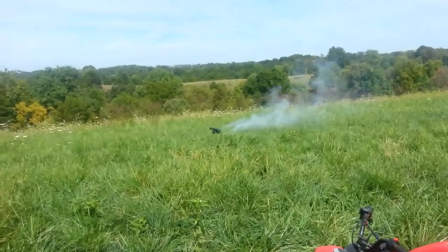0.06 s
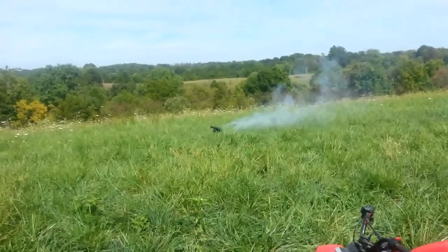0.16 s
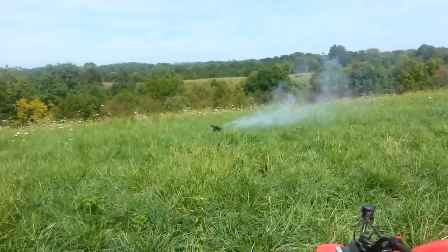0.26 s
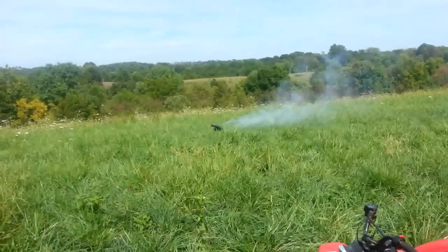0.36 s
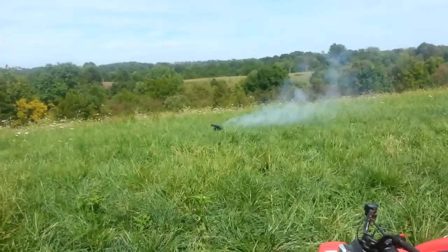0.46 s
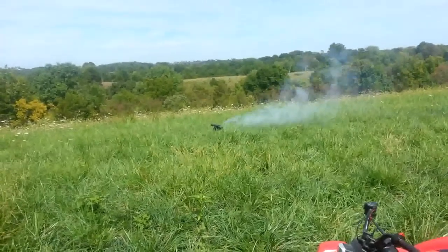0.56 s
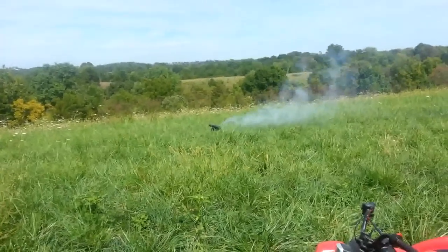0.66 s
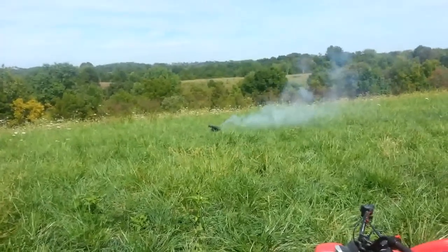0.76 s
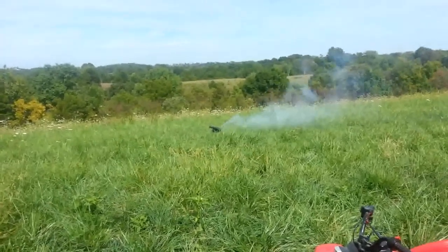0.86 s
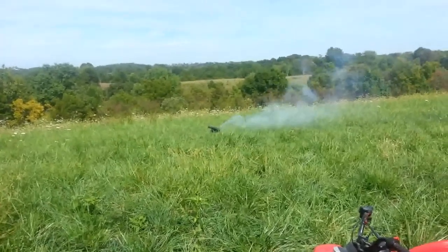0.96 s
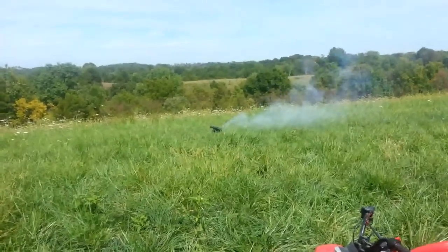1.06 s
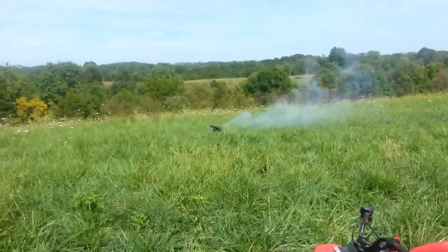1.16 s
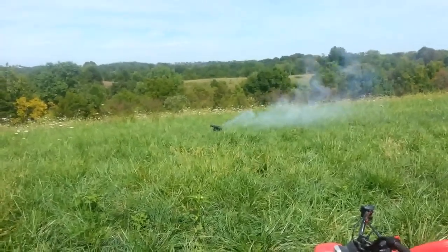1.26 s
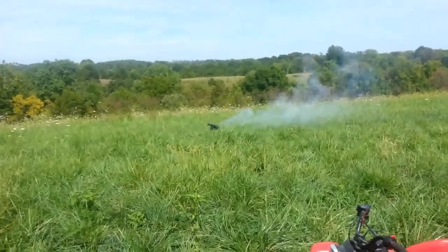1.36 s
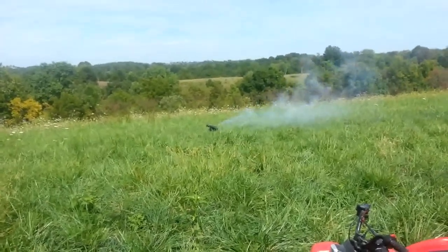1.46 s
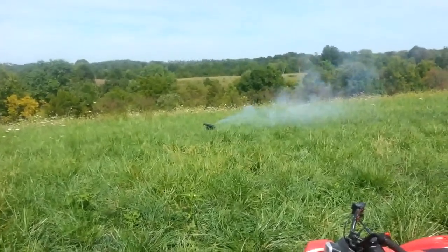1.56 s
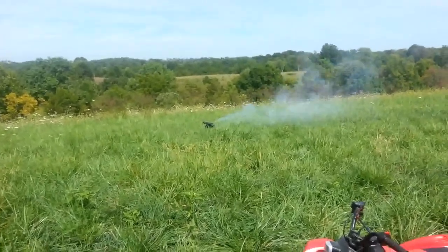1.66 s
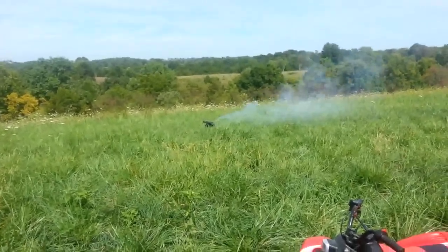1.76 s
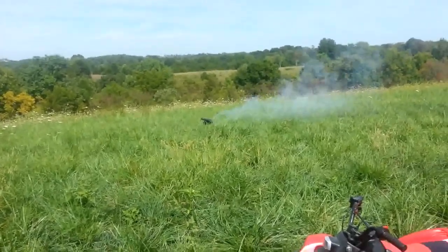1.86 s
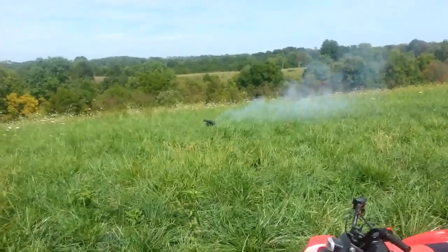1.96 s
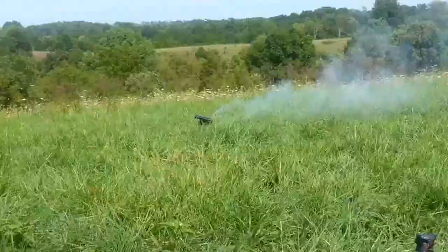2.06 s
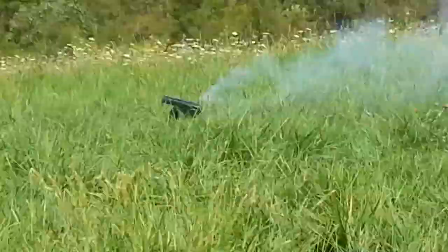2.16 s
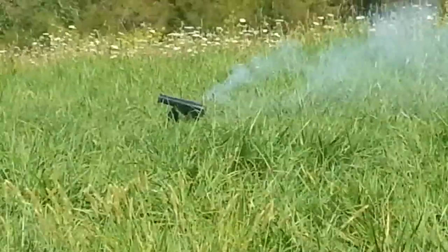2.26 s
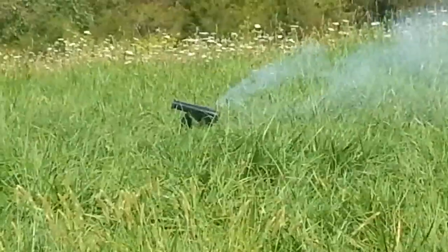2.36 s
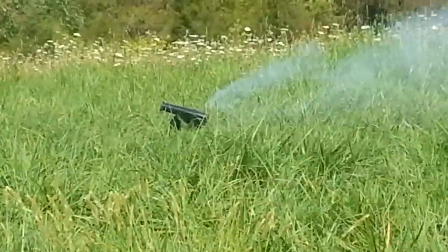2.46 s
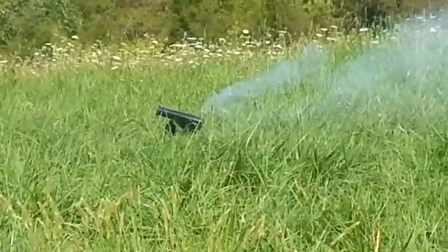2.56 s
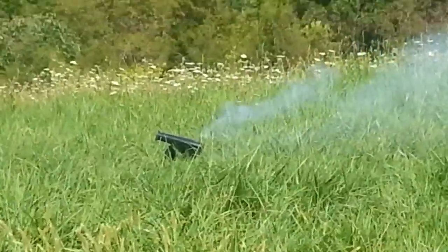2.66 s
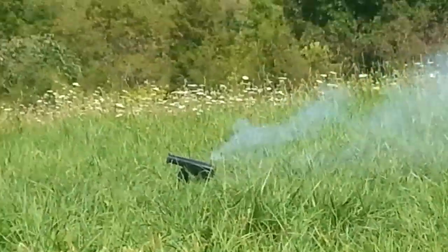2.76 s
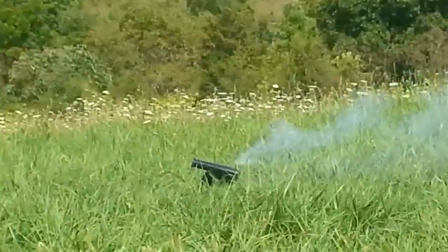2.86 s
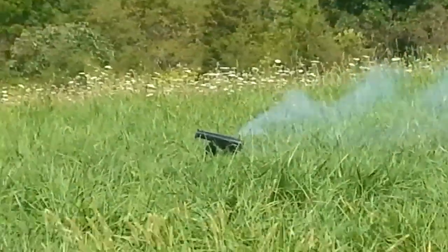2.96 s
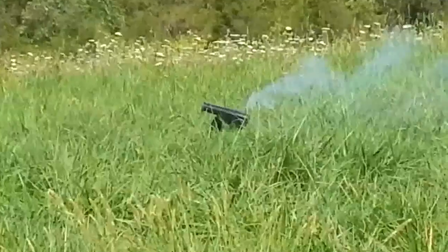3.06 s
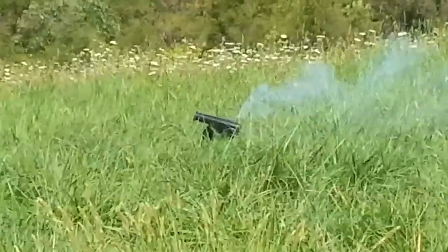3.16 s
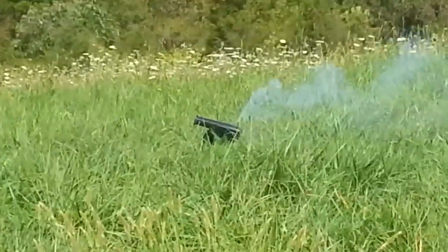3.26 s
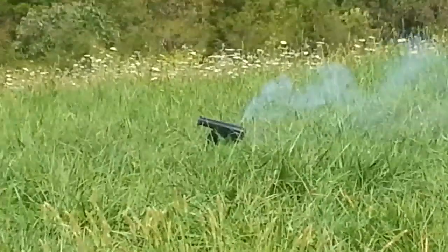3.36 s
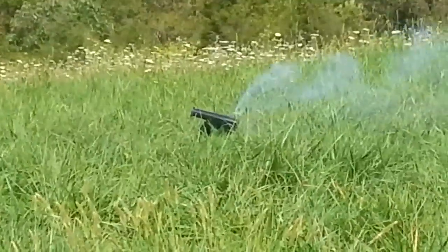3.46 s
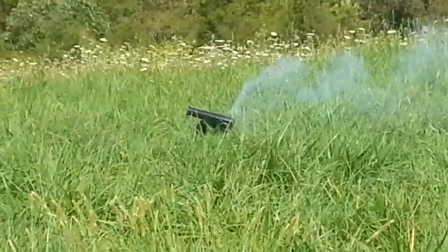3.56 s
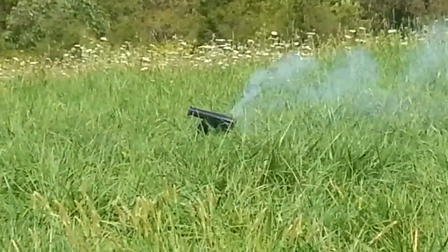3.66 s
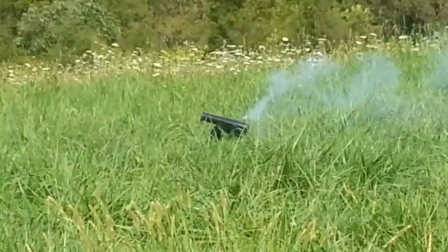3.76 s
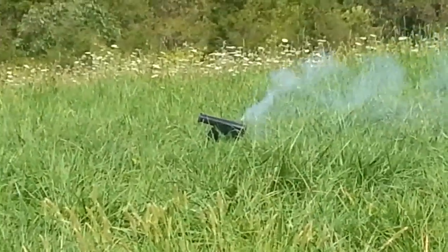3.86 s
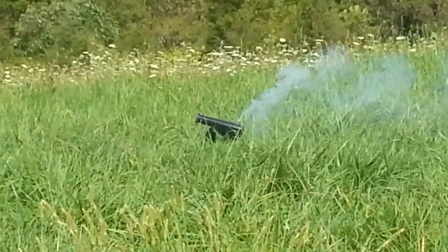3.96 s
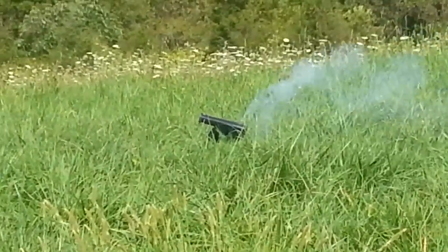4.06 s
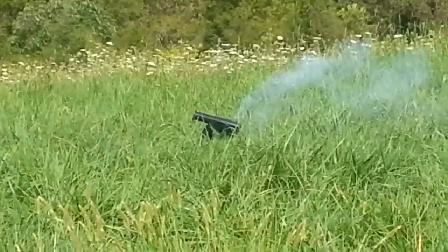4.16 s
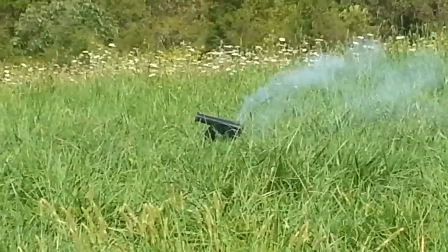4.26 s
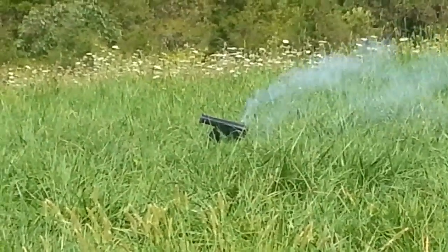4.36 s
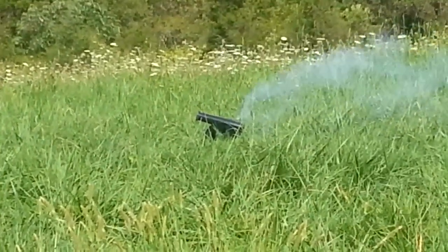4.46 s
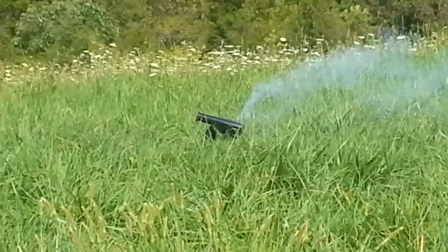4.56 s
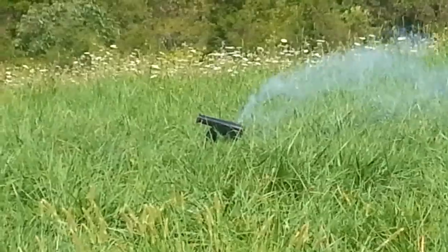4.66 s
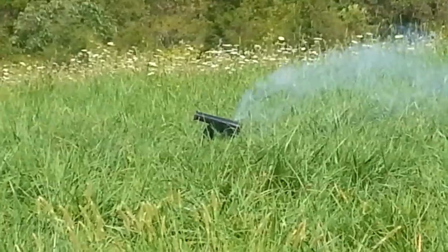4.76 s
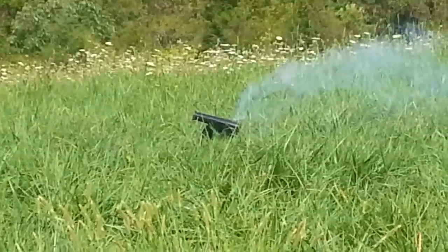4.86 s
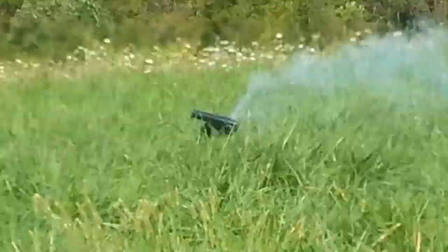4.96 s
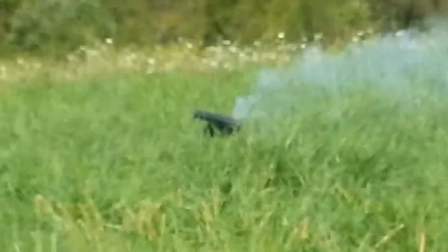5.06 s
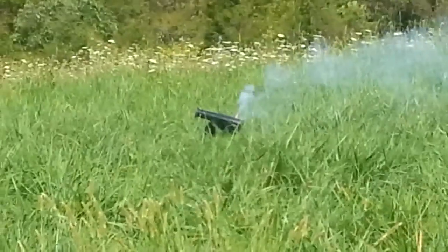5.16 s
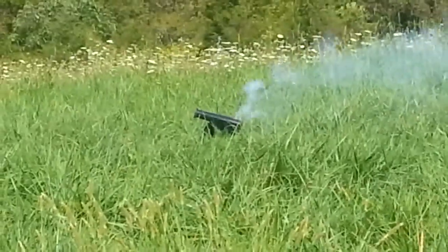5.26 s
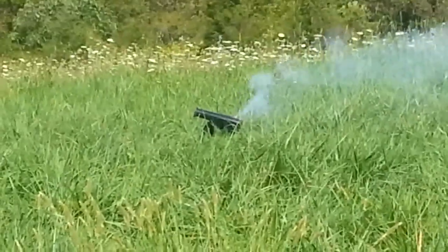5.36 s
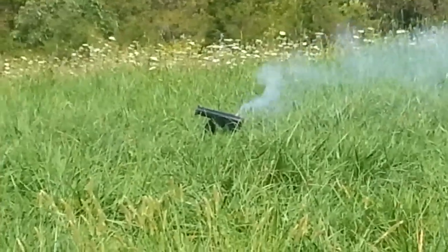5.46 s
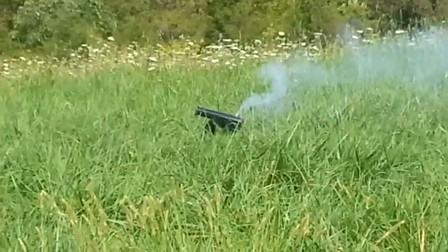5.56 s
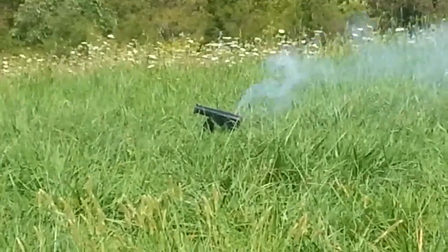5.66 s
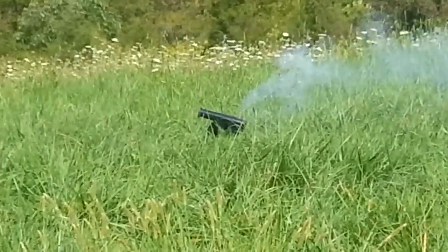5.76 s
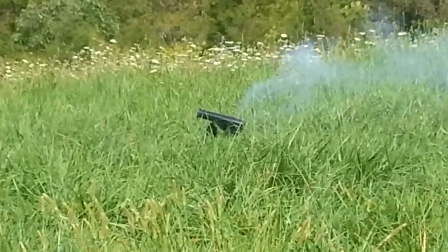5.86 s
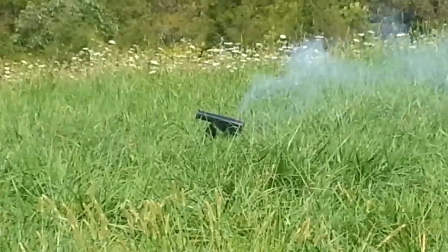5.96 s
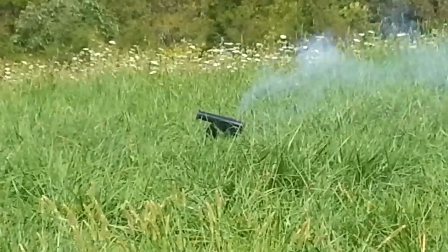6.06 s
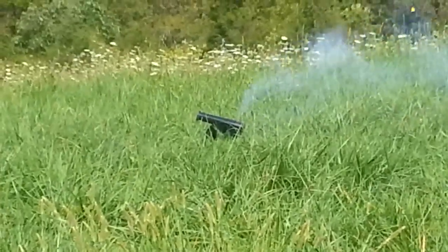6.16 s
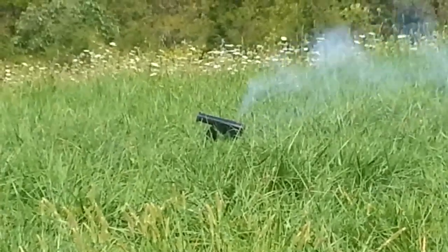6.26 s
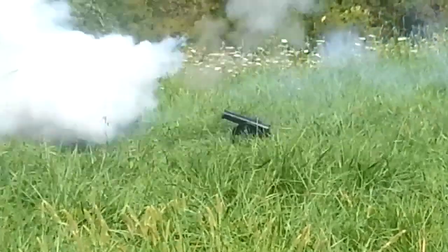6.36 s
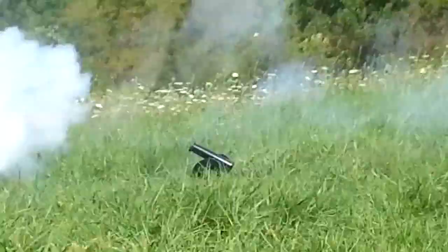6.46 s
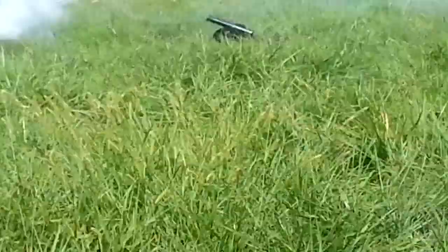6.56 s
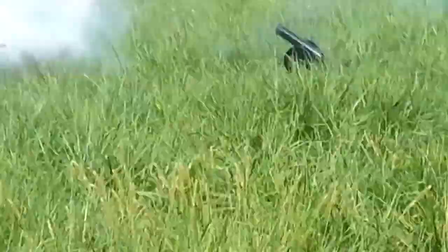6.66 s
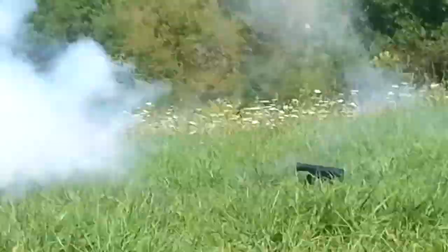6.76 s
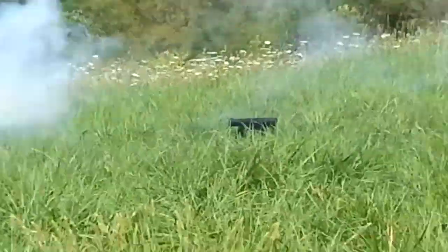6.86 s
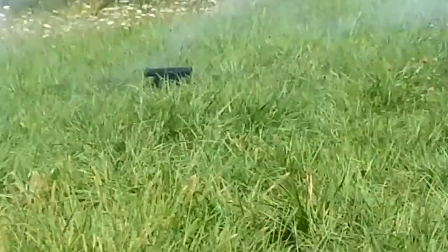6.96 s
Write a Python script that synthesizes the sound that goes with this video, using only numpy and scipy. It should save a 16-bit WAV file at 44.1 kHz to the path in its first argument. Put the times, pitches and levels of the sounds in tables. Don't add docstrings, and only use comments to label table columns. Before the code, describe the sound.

A quiet summer meadow heard through a handheld stereo microphone. From 0 s a fuse hisses thinly and unevenly, with a fast, raspy katydid buzz, a high throbbing cricket, and soft breeze. Light finger taps land at 0.3 and 0.7 s; a tiny strap creak comes near 1.7 s, then a cluster of taps and a hard, close plastic knock at 1.9 s. The buzz stops around 2.8 s; from 3.0 to 4.8 s the katydid only ticks, about twelve times a second, over distant insect hiss, with rough slips and dry clicks strongest near 3.1 s. The buzz swells again from 4.8 s and the fuse flares at 5.9 s. At 6.47 s the cannon fires: an abrupt, distorted, full-scale bang with dense ground roar, hard slaps near 6.6 and 6.7 s, then a bright tree echo from 6.72 s, fading and dulling to the end, the meadow greatly ducked.

```python
import sys
import numpy as np
from scipy import signal
from scipy.fft import rfft, irfft, next_fast_len
from scipy.io import wavfile

SR = 44100
rng = np.random.default_rng(int(sys.argv[2]) if len(sys.argv) > 2 else 0)


def wrap_up_sound(samples):
    columns = np.atleast_2d(samples).T
    tamed = np.clip(columns, -1, 1)
    steps = np.round(tamed * 32767).astype(np.int16)
    wavfile.write(sys.argv[1], SR, steps)


def magnitude_from_level(level_db):
    exponent = np.asarray(level_db, float) / 20
    return 10 ** exponent


N = 309564
TIME = np.arange(N) / SR
FIRE_S = 6.4748


def rms_one(x):
    return x / np.sqrt(np.mean(x ** 2) + 1e-20)


def at_hz(points, hz):
    points = np.array(points)
    return np.interp(np.log(hz + 1), np.log(points[:, 0]), points[:, 1])


def pan(x, db):
    return np.outer(magnitude_from_level([min(db, 0), min(-db, 0)]), x)


def band(x, low_hz, high_hz):
    return signal.sosfilt(signal.butter(2, [low_hz, high_hz], "band", fs=SR, output="sos"), x)


def resonance(x, hz, width_hz):
    r = np.exp(-np.pi * width_hz / SR)
    poles = [1, -2 * r * np.cos(2 * np.pi * hz / SR), r * r]
    return signal.lfilter([(1 - r * r) / 2, 0, (r * r - 1) / 2], poles, x)


def ring(force, hz, t60):
    r, w = magnitude_from_level(-60 / (t60 * SR)), 2 * np.pi * hz / SR
    return signal.lfilter([0, np.sin(w)], [1, -2 * r * np.cos(w), r * r], force)


def shock(s, width_s):
    u = (TIME - s) / width_s
    return np.where((u >= 0) & (u < 1), 1 - 2 * u, 0)


def drift(rate):
    return np.interp(TIME * rate, np.arange(800), rng.standard_normal(800))


def swells(rows):
    return sum(magnitude_from_level(db) * np.exp(-((TIME - s) / half_s) ** 2) for s, half_s, db in rows)


def ramp(start_s, length_s):
    return np.clip((TIME - start_s) / length_s, 0, 1)


def wide_noise(spectrum, alike, balance):
    size = next_fast_len(N)
    hz = np.arange(size // 2 + 1) * SR / size
    mid, side = rfft(rng.standard_normal((2, size))) * magnitude_from_level(at_hz(spectrum, hz))
    share = np.clip(at_hz(alike, hz), -1, 1)
    tilt = magnitude_from_level(at_hz(balance, hz) / 2)
    mid, side = mid * np.sqrt(1 + share), side * np.sqrt(1 - share)
    return irfft(np.array([(mid + side) * tilt, (mid - side) / tilt]), size)[:, :N]


def cannon():
    # arrival in seconds, level in dB, left-right difference in dB.
    slaps = [(6.59, -3, 14), (6.696, 3, 21), (6.7115, 4, 23), (6.8945, -2, 2), (6.8975, 4, 18),
             (6.942, -12, 9)]
    after = TIME - FIRE_S
    rise = np.where(after < 0, magnitude_from_level(-24) * np.exp(np.minimum(after, 0) / .0022), 1)
    excess = magnitude_from_level(10 * np.exp(-np.maximum(after, 0) / .05))
    handover = ramp(6.712, .025)
    ground = from_right(ground_roar(), 17, ramp(6.47, 0.039))
    trees = from_right(tree_roar(), 16, 1)
    out = rise * excess * np.sqrt(1 - handover) * ground + np.sqrt(handover) * magnitude_from_level(7) * trees
    thud_push = np.exp(-((TIME - 6.606) / 0.00089) ** 2) / (.002 * SR)
    out += magnitude_from_level(-5) * ring(thud_push, hz=137, t60=.1)
    out += magnitude_from_level(12.5) * band(shock(FIRE_S, 0.0038), 100, 21000)
    for s, db, side_db in slaps:
        out += pan(magnitude_from_level(db + 4) * band(shock(s, 0.00104), 550, 5900), side_db)
    return out


def ground_roar():
    # frequency in Hz, level in dB per Hz.
    tone = [(24, -55), (40, -18.5), (125, -10.5), (173, -10), (277, -4), (466, -4), (720, -4), (1170, -9),
            (2710, -13.5), (2990, -17.5), (4230, -17.5), (8270, -29), (15000, -33)]
    # frequency in Hz, likeness from 0 to 1.
    alike = [(60, .8), (300, .97), (1400, 0.82), (3000, 0.27), (8000, 0.23)]
    burst_s = 0.019
    later = np.maximum(TIME - FIRE_S - burst_s, 0)
    tail_db = -16 + 13.5 * np.exp(-later / 0.037) - 3 * later
    burst_db = -1 - 14 * ramp(FIRE_S, .8 * burst_s)
    level_db = burst_db + (tail_db - burst_db) * ramp(FIRE_S + 0.51 * burst_s, .012)
    low_db = -3 + 7 * np.exp(-((TIME - 6.59) / 0.073) ** 2)
    return returns(level_db, low_db, 8 - 125 * later, tone, alike, lumpy_db=4)


def tree_roar():
    # frequency in Hz, level in dB per Hz.
    tone = [(24, -52), (40, -29), (91, -21), (173, -10), (270, -12.5), (346, -7), (582, -3), (710, 2),
            (1200, 0.5), (2280, 3), (2920, -6), (3140, -3), (4450, -6.5), (15000, -40)]
    # frequency in Hz, likeness from 0 to 1.
    alike = [(60, 0.66), (300, 0.97), (1400, 0.66), (3000, 0.29), (8000, 0.12)]
    start_s, rise_s, hold_s = 6.722, .02, .045
    after = np.maximum(TIME - start_s, 0)
    held_s = start_s + rise_s + hold_s
    level_db = -16.5 - 10.5 * (1 - ramp(start_s, rise_s))
    level_db += -2 * ramp(held_s, 0.019) - 23 * np.maximum(TIME - held_s, 0)
    low_db = 1 + 3.5 * np.exp(-after / 0.028)
    return returns(level_db, low_db, 8.5 - 75 * after, tone, alike, lumpy_db=2)


def returns(level_db, low_db, high_db, tone, alike, lumpy_db):
    # frequency in Hz, left-right difference in dB.
    shot_pan = [(60, 2.5), (240, -0.5), (940, 1.5), (3710, 1.5), (14700, 1)]
    start = round(6.4 * SR)
    roar = wide_noise(tone, alike, shot_pan)[:, start:]
    spectrum = rfft(roar / np.std(band(roar.mean(axis=0), 1200, 3500)))
    octave = np.log2(np.arange(spectrum.shape[1]) * SR / (N - start) + 1)
    level_db, low_db, high_db = level_db[start:], low_db[start:], high_db[start:]
    dulling_db, brightening_db = np.minimum(high_db, 0), np.maximum(high_db, 0)
    out = np.zeros((2, N))
    for centre in np.arange(5, 15, .5):
        part = irfft(spectrum * np.clip(1 - 2 * np.abs(octave - centre), 0, 1), N - start)
        low = np.clip(10.5 - centre, 0, 1)
        high = max(2 ** centre - 2500, 0) / 6500
        part_db = level_db + low * low_db + high * dulling_db + min(6.3 * high, 1) * brightening_db
        out[:, start:] += part * magnitude_from_level(part_db + lumpy_db * drift(60)[start:])
    return out


def from_right(x, lag, share):
    left = np.sqrt(1 - share) * x[0] + np.sqrt(share) * np.roll(x[0], lag)
    return np.array([left, x[1]])


def fuse():
    # time in seconds, level in dB.
    burn = [(0.0, -55), (0.83, -57.5), (1.56, -57.5), (1.98, -54), (2.36, -53.5), (2.61, -52.5),
            (3.27, -53.5), (3.51, -56), (4.05, -56.5), (4.3, -51.5), (4.66, -55.5), (5.47, -57.5),
            (5.88, -51), (6.46, -52)]
    # centre in Hz, width in Hz, level in dB, share of the flare.
    jets = [(2470, 540, -1.5, 2.8), (3696, 570, 0, 0.83), (4170, 1100, 2.5, 0.79), (4800, 900, -16.5, 1.2)]
    own, shared = rng.standard_normal((2, N)), rng.standard_normal(N)
    spit = rms_one(own + 2.7 * shared) * magnitude_from_level(drift(110))
    level_db = np.interp(TIME, *np.transpose(burn))
    flare_db = -0.06 * (level_db + 54.5)
    hiss = np.zeros((2, N))
    for hz, width, db, share in jets:
        jet = resonance(resonance(spit, hz, width), hz, 2 * width)
        hiss += magnitude_from_level(db + share * flare_db + 0.52 * drift(15)) * jet
    return hiss * magnitude_from_level(level_db + 12)


def handling():
    # time in seconds, peak in dB, ring in Hz, left-right in dB, snap in dB.
    taps = [(0.331, -43, 726, -3, -1), (0.692, -27.5, 1077, -3.5, 3), (1.588, -33, 430, 21, 3),
            (1.726, -40, 584, 14, -7), (1.938, -35, 547, 22, 3), (1.9955, -32, 764, 13, 4.5),
            (2.176, -45, 537, 11, -6), (2.253, -45, 1310, -9, -3), (2.519, -42, 1380, 2.5, -5),
            (3.015, -25, 170, 29, -19), (3.083, -28, 530, 24, -5), (3.243, -28, 455, 30, -9),
            (5.843, -39, 230, 0.0, -12), (6.16, -41.5, 302, 7, -3.5)]
    # peak in dB, ring in Hz, left-right in dB, t60 in seconds, snap in dB.
    knock = [
        (-19, 613, 28, 0.052, 2),
        (-9.5, 960, -36.5, 0.012, -6),
        (-20, 1100, 44, 0.0022, 23.5),
        (4.5, 526, 56, 0.0077, -11.5),
        (-27.5, 1340, 32, 0.018, 21.5),
    ]
    knock_s = (1.9022, 1.9076, 1.9077, 1.9081, 1.9195)
    # time in seconds, peak in dB, ring in Hz, left-right in dB.
    rubs = [(1.489, -51, 816, -5), (2.412, -46, 676, 10), (2.468, -41, 614, 41), (2.993, -36.5, 474, 15),
            (3.038, -49, 536, 12), (3.08, -30.5, 523, 41), (3.151, -36.5, 517, 27),
            (3.206, -36.5, 1080, -3), (3.224, -36.5, 900, 13), (3.243, -30, 834, 35), (3.767, -46, 543, 2),
            (3.901, -45.5, 1490, 3), (4.199, -52, 890, -3), (4.416, -49.5, 830, 0.0),
            (5.665, -45.5, 704, -2)]
    # time in seconds, level in dB, left-right in dB.
    clicks = [(.334, -36, -3), (2.057, -38, 12), (2.178, -38, 15), (2.410, -28.5, 8), (2.471, -27, 20),
              (2.524, -36, 4), (3.086, -21.5, 20), (3.246, -34, 22), (3.775, -29, 3), (4.424, -44, 2),
              (5.845, -48, 0)]
    # time in seconds, half length in seconds, level in dB.
    creaks = [(1.675, 0.026, -52), (1.8, 0.024, -50)]
    out, size = np.zeros((2, N)), SR // 10
    t = np.arange(size) / SR
    touch = t == 0
    rattle = band(rng.standard_normal(size), 800, 6000) * np.exp(-t / .004)
    snap = ring(touch, 4000, .002) + .6 * ring(touch, 2200, .003)
    snap += .4 * ring(touch, 8500, .0012) + .1 * rattle
    hits = [(s + 0.00176, db, hz, side_db, 0.031 * (hz / 1e3) ** 0.58, snap_db)
            for s, db, hz, side_db, snap_db in taps]
    hits += [(s, *row) for s, row in zip(knock_s, knock)]
    for s, db, hz, side_db, t60, snap_db in hits:
        tap = band(ring(touch, hz, t60), hz / 2, 16000) + magnitude_from_level(snap_db) * snap
        out[:, round(s * SR):][:, :size] += pan(magnitude_from_level(db + 4.5) * tap, side_db)
    for s, db, hz, side_db in rubs:
        fade_s = 0.018 / np.exp(.025 * abs(side_db))
        push = rng.standard_normal(size) * np.exp(-t / fade_s) * (1 - np.exp(-t / 0.0044))
        rub = resonance(push, hz, 320) + 0.5 * resonance(push, 1.9 * hz, 500)
        rub = band(rub, 100, 1.95 * hz)
        out[:, round(s * SR):][:, :size] += pan(magnitude_from_level(db + 4.5) * rub / np.abs(rub).max(), side_db)
    for s, db, side_db in clicks:
        out += pan(magnitude_from_level(db) * band(shock(s, 0.0007), 300, 3500), side_db)
    creak_hz = 301.5 + 148.5 * np.exp(-np.maximum(TIME - 1.6, 0) / 0.098)
    out += pan(swells(creaks) * np.sin(2 * np.pi * np.cumsum(creak_hz) / SR), 3)
    return band(out, 132, 11000)


def katydid():
    # frequency in Hz, level in dB per Hz.
    wing = [(5000, -85), (8500, 2), (9160, -2.5), (9980, 2), (11400, -1.5), (12300, -9), (14000, -13.5),
            (14600, -9.5)]
    # start in seconds, end in seconds, full level in dB, swell in seconds, strokes per second.
    buzzes = [
        (0, 2.83, -45, 1.3, 91.6),
        (4.78, 7.7, -46.5, 2, 92.5),
    ]
    # time in seconds, peak in dB.
    ticks = [(3.0462, -49), (3.158, -41), (3.2458, -41), (3.3231, -44), (3.4044, -44), (3.4782, -40),
             (3.5516, -41), (3.6329, -41), (3.7292, -38), (3.799, -36.5), (3.8733, -38), (3.9567, -37.5),
             (4.0403, -38), (4.1293, -40), (4.237, -39), (4.3228, -40), (4.4131, -41), (4.5264, -41),
             (4.6157, -42), (4.7479, -44), (4.8092, -57)]
    rasp = rms_one(wide_noise(wing, [(9000, 0.18), (14000, 0.39)], [(9000, -2.5), (14000, -33.5)]))
    strokes = np.zeros(N)
    for start, end, db, swell_s, per_s in buzzes:
        on = (TIME >= start) & (TIME < end)
        effort_db = -9 * (1 - ramp(start, swell_s)) ** 1.6 - 4.5 * ramp(end - 0.21, 0.21)
        turn = per_s * TIME + .2 * drift(2.5)
        strokes += on * magnitude_from_level(db + effort_db + 6) * (0.15 + np.abs(np.sin(np.pi * turn)) ** 1.3)
    for s, db in ticks:
        strokes += magnitude_from_level(db - 0.5) * np.exp(-((TIME - s - .004) / 0.0043) ** 2)
    return rasp * strokes


def crickets():
    # time in seconds, half length in seconds, level in dB.
    bouts = [(.8, 0.22, -65), (1.4, 0.19, -64), (2.1, 0.6, -60.5), (2.8, 0.36, -64), (5.25, 0.19, -71),
             (5.9, .2, -69.5)]
    chorus = rms_one(resonance(resonance(rng.standard_normal((2, N)), 8080, 800), 8060, 1010))
    turn = (28.8 * TIME + .3 * drift(1.5)) % 1
    slide = np.sin(2 * np.pi * np.cumsum(8400 - 1000 * turn + 50 * drift(100)) / SR)
    rasp = 1 + .55 * rms_one(band(rng.standard_normal(N), 100, 600))
    near = pan(rms_one(slide * np.sin(np.pi * turn) ** 2 * rasp), -10.5)
    both = magnitude_from_level(-60) * chorus + (magnitude_from_level(-57.5) + swells(bouts)) * near
    return both * magnitude_from_level([[-2.5], [2.5]])


def far_katydids():
    # time in seconds, half length in seconds, level in dB.
    far_swells = [(2.1, .6, -74), (3.15, 0.78, -55.5), (4.4, 0.22, -60), (5.2, 0.22, -72),
                  (6.2, 0.58, -49.5)]
    hiss = rms_one(band(rng.standard_normal((2, N)), 6000, 13300))
    flutter = 1 + .25 * np.sin(2 * np.pi * 100 * TIME)
    return hiss * (magnitude_from_level(-66) + swells(far_swells)) * magnitude_from_level([[-4], [3.5]]) * flutter


def air():
    # frequency in Hz, level in dB per Hz.
    colour = [(60, -31), (109, -14), (317, -3.5), (727, -3.5), (1130, -6.5), (1500, -4), (2200, -1),
              (3050, -4.5), (4200, -4), (5300, -8.5), (6300, -19.5), (7600, -1), (9200, -10.5),
              (14500, -15.5)]
    # frequency in Hz, likeness from 0 to 1.
    alike = [(60, 0.02), (130, 0.064), (290, 0.26), (630, 0.2), (1390, 0.37), (3050, 0.04), (6700, 0.05),
             (14700, 0.064)]
    # frequency in Hz, left-right difference in dB.
    balance = [(60, -1), (180, 2), (540, -1), (1630, 0.5), (4890, 1), (14700, -7.5)]
    # time in seconds, half length in seconds, dB added to the calm amplitude.
    gusts = [(.2, 0.37, -64.5), (.85, .2, -61.5), (1.25, .15, -65), (1.85, 0.24, -61), (2.4, 0.28, -69),
             (3.2, 0.72, -64), (3.8, 0.11, -65), (4.3, 0.38, -69.5), (5.6, 0.49, -65), (6.4, 0.34, -65)]
    noise = wide_noise(colour, alike, balance)
    noise = noise / np.std(band(noise.mean(axis=0), 100, 1500))
    return noise * (magnitude_from_level(-59.5) + swells(gusts)) * magnitude_from_level(drift(5.116))


def scene():
    meadow = fuse() + katydid() + crickets() + far_katydids() + air()
    meadow = signal.sosfilt(signal.cheby2(20, 50, 14850, fs=SR, output="sos"), meadow)
    return cannon() + handling() + meadow * np.where(TIME < FIRE_S, 1, magnitude_from_level(-22))


def top_cut(x):
    return signal.sosfilt(signal.butter(12, 15290, fs=SR, output="sos"), x)


def record(dry):
    squashed = dry / (1 + np.abs(dry / 1.08) ** 6) ** (1 / 6)
    highs = signal.butter(2, 4500, "high", fs=SR, output="sos")
    side = signal.sosfiltfilt(highs, (squashed[0] - squashed[1]) / 2)
    merge = 0.84 * (TIME > FIRE_S) * (1 - ramp(6.54, .06))
    joined = squashed - merge * side * [[1], [-1]]
    cut = signal.sosfilt(signal.cheby2(10, 60, 16300, fs=SR, output="sos"), joined)
    return top_cut(np.clip(cut, -1, 1))


dry = scene()
out = record(dry)
wrap_up_sound(out)
```